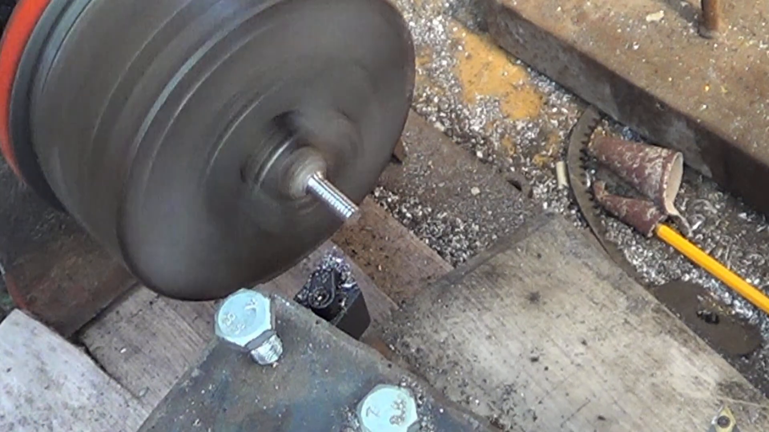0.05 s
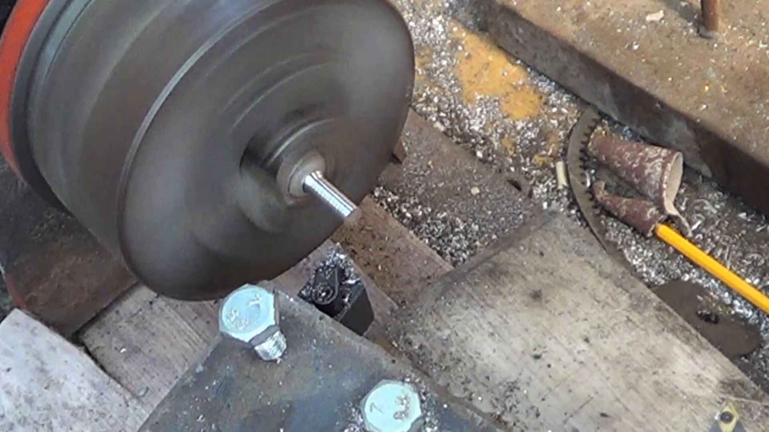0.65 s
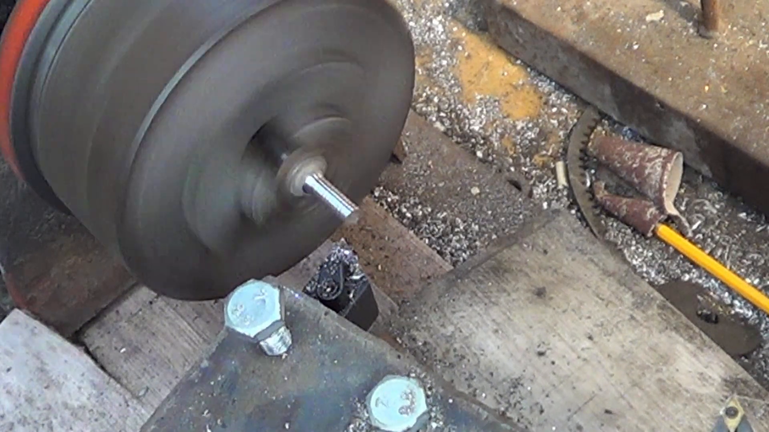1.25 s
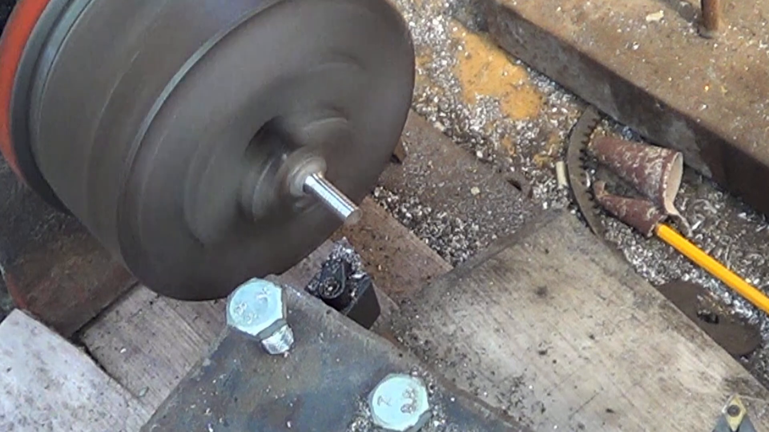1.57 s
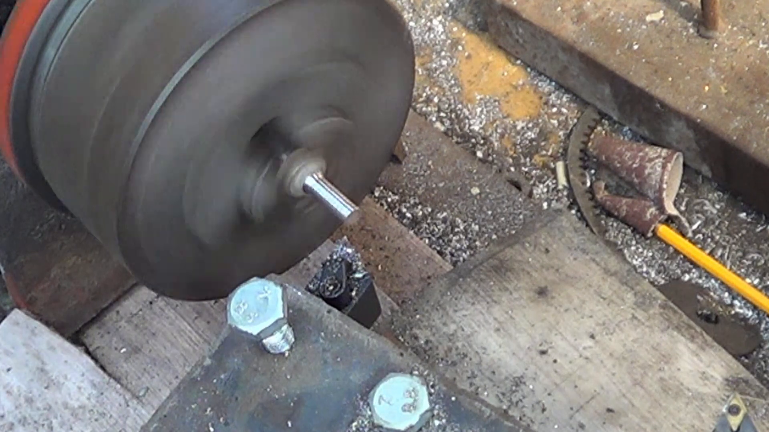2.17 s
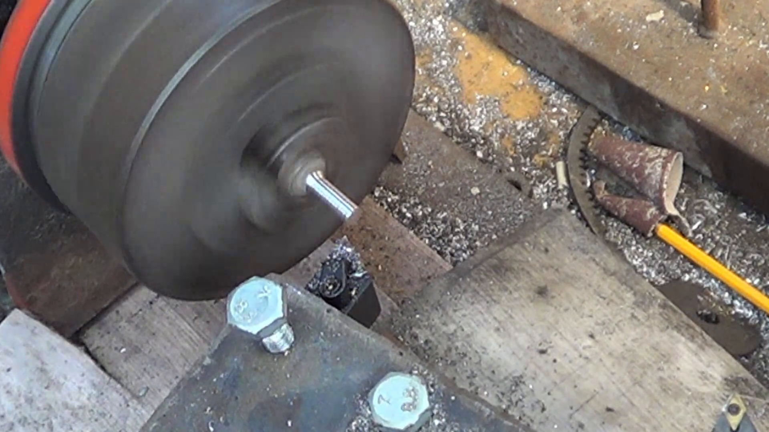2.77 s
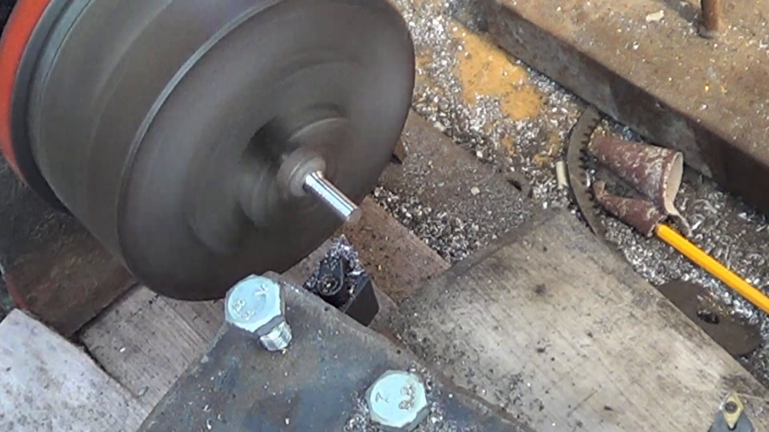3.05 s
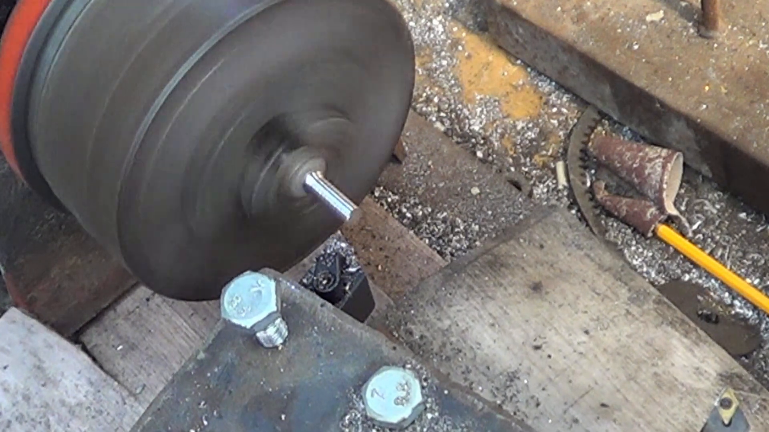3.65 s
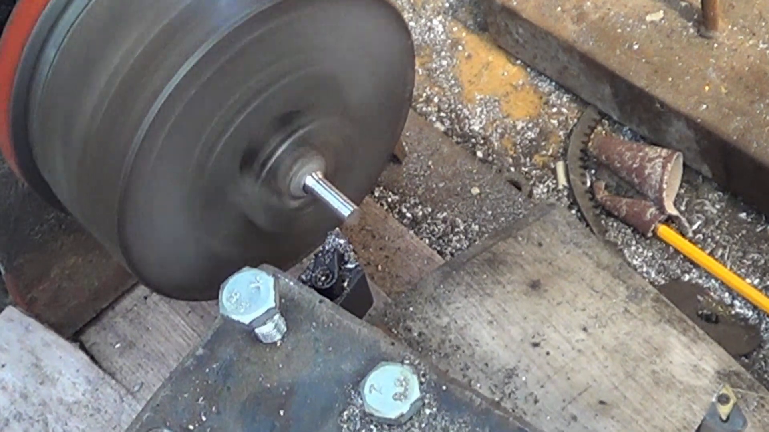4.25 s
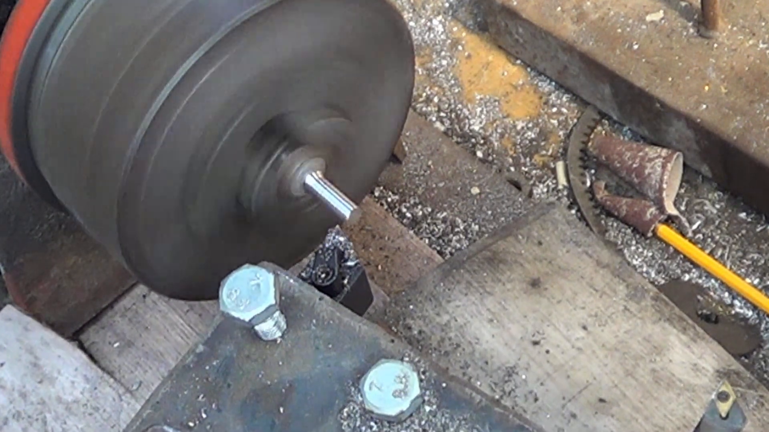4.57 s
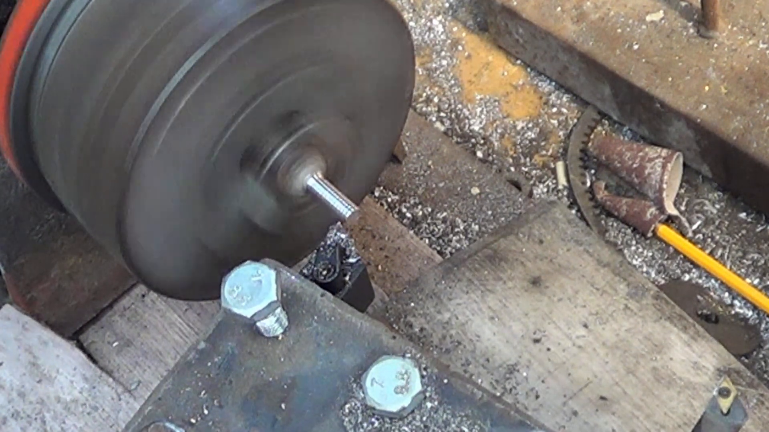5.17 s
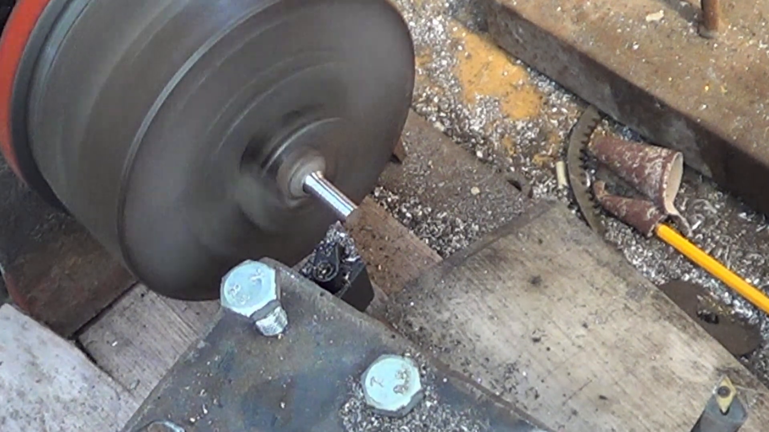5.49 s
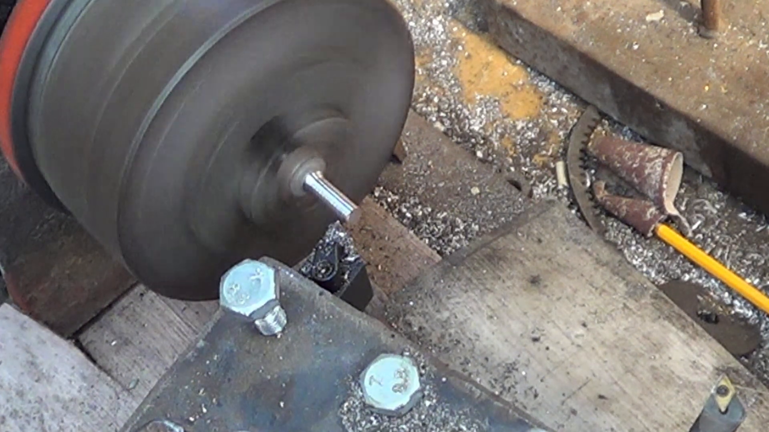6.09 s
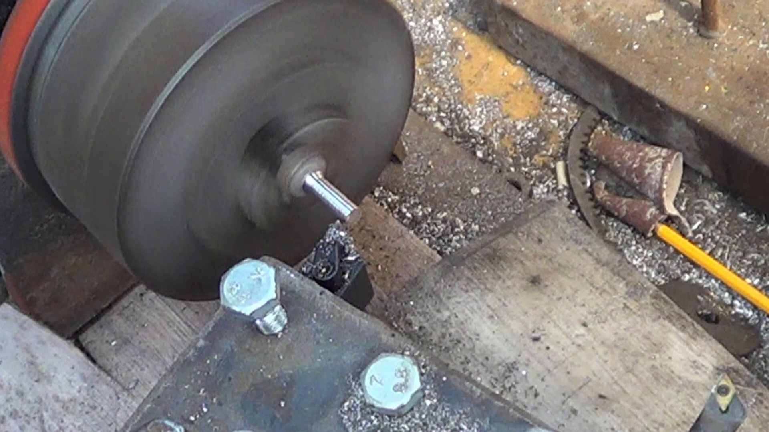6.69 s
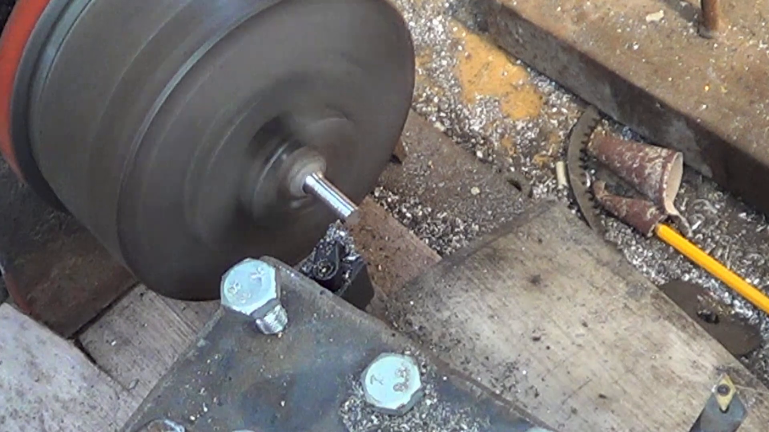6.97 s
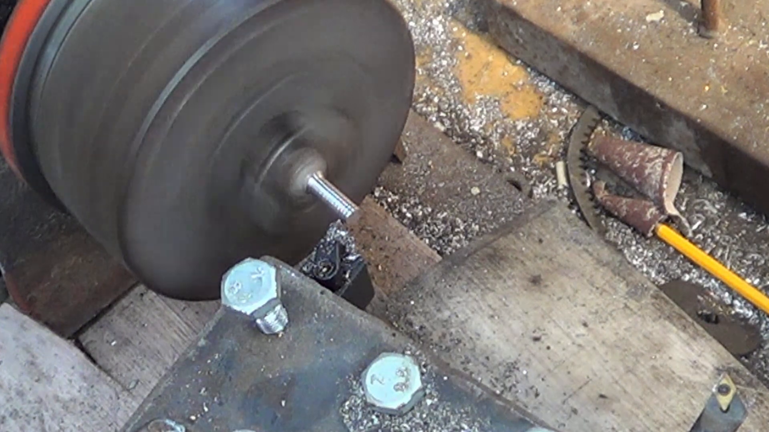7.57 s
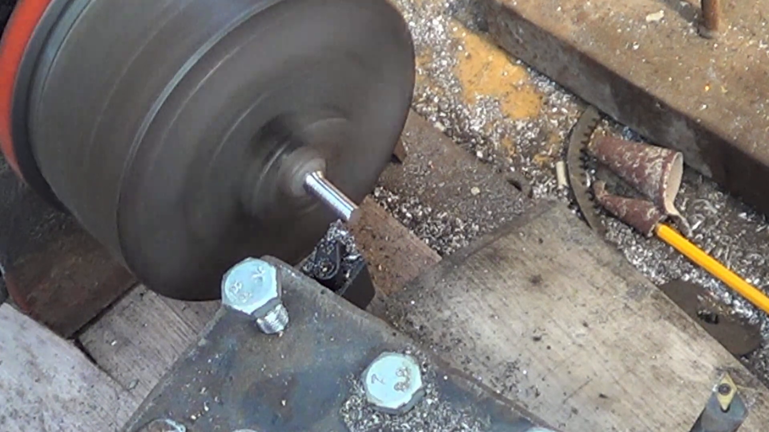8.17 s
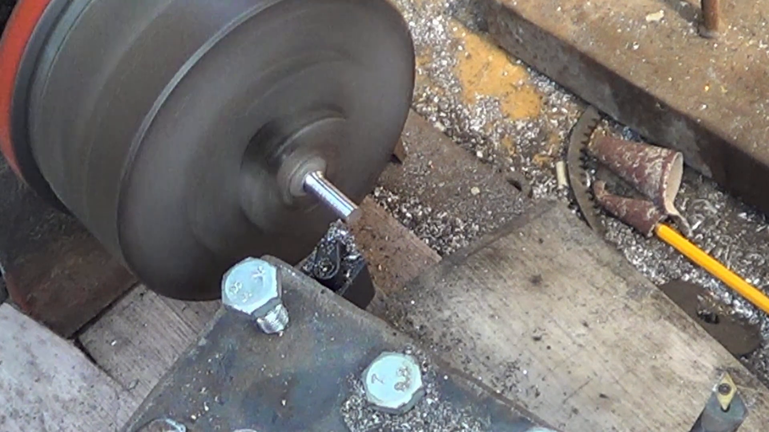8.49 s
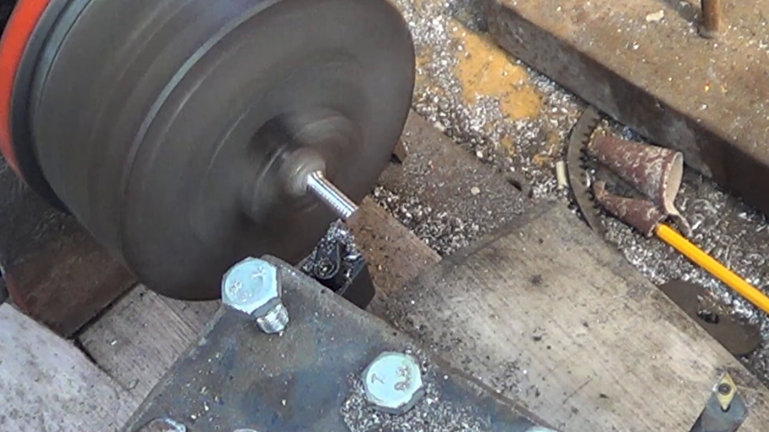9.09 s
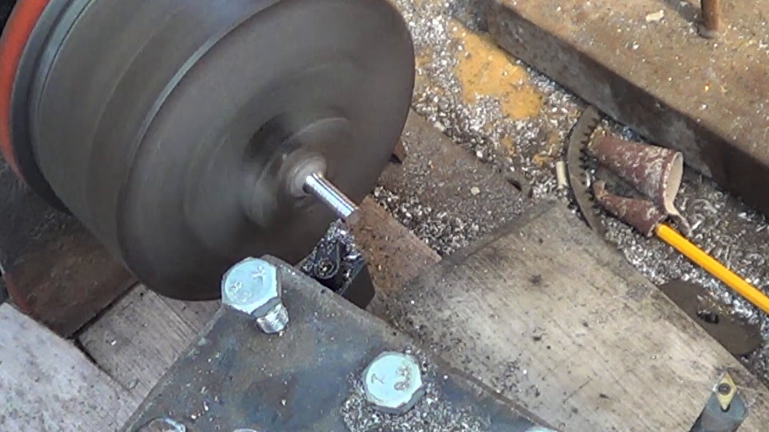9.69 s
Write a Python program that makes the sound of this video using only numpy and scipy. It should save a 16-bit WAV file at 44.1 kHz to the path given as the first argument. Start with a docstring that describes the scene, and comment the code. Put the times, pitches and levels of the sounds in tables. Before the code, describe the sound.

Close up, a lathe's electric motor whines and hisses, gradually gaining speed while its gears hum and a steel part rings.

```python
"""A workshop, with a stereo pair close to a small metal lathe that spins a bolt in its chuck.
The motor slowly gathers speed: its whine climbs through the resonances of its housing, and its
carbon brushes hiss on the commutator. The gear train hums and rattles in the headstock, where one
steel part keeps ringing. A short, diffuse reverberation gives the sound width."""
import sys
import numpy as np
from scipy import signal
from scipy.fft import rfft, irfft, next_fast_len
from scipy.io import wavfile
from scipy.ndimage import map_coordinates

SR = 44100
rng = np.random.default_rng(int(sys.argv[2]) if len(sys.argv) > 2 else 0)


def to_wav(sig):
    """Store sig (one row per channel, or 1-D mono) as 16-bit WAV at the path in sys.argv[1].

    Samples outside -1..1 are clipped; the rate is SR.
    """
    pcm = np.clip(np.atleast_2d(sig), -1, 1) * 32767
    pcm = np.round(pcm).astype(np.int16)
    wavfile.write(sys.argv[1], SR, pcm.T)  # frames by channels


N = 433944

SLOTS, TOP_SPEED = 18, 357.16  # armature slots; turns a second that the motor tends towards
TOP_HZ = 15680  # upper edge of the band
# parts geared to the motor, each binding once a revolution: motor turns each, tight spot t/s, swell/dB
CHUCK, PULLEY, BELT = (38.02, 0.002, .5), (21.99, 0.067, .4), (141, 0.034, .35)
# quick and slow stage of the run-up: speed still to gain/Hz, time constant/s
RUN_UP_STAGES = [(43.21, 1.9), (102.09, 9.7)]
# the armature's slot tones: multiple of the slot rate, level/dB, base level of the side tones/dB
SLOT_HARMONICS = [(1, -43, -47), (2, -55.5, -58.5), (3, -49, -54), (4, -36, -55)]
# overtones the uneven armature favours: order (multiple of the motor speed), level/dB
FAVOURED_ORDERS = [(16, -46), (31, -53), (33, -48), (43, -44), (50, -50), (55, -48), (61, -50.5)]
# how well the motor housing radiates: f/Hz, level/dB
HOUSING_RESPONSE = [(2000, -4.5), (3000, -3), (4300, 1.5), (5000, -3), (5500, -1), (6500, -.5), (7500, 0),
                    (8500, 1.5), (9400, 3), (10500, -1), (12000, 2), (13000, 1.5), (14500, 2.5), (15600, 3)]
# housing modes, each driven by the overtone whose force pattern fits it: order, f/Hz, width/Hz, level/dB
HOUSING_MODES = [(12, 3673, 46, -43.8), (12, 3765, 36, -46.4), (14, 3290, 70, -41), (15, 4362, 133, -39.4),
                 (16, 3590, 90, -37.5), (16, 4968, 52, -41.7), (17, 4427, 183, -42.4),
                 (17, 5367, 45, -37.1), (18, 3860, 260, -38), (18, 4270, 220, -32), (18, 5540, 16, -37.5),
                 (18, 5625, 70, -37), (18, 5728, 40, -37), (20, 5361, 109, -44.0), (21, 5368, 50, -36),
                 (21, 6519, 62, -43.8), (22, 6050, 330, -43.5), (22, 6699, 202, -46.0),
                 (22, 6928, 157, -45.4), (25, 7479, 252, -43.6), (26, 8147, 137, -39.2),
                 (29, 8639, 351, -44.8), (30, 9140, 222, -37.6), (30, 9518, 89, -39.2),
                 (32, 9430, 336, -38.6), (32, 10120, 240, -42.9), (33, 9480, 448, -39.7),
                 (34, 10604, 369, -43.0), (35, 7956, 646, -41.2), (35, 9120, 368, -36.8),
                 (36, 7740, 210, -27), (36, 8080, 220, -27.5), (36, 8620, 400, -38), (36, 9230, 200, -33.5),
                 (36, 9920, 620, -29.5), (36, 10470, 220, -36), (36, 10980, 70, -34), (36, 11290, 220, -37),
                 (37, 8666, 565, -39.8), (37, 9428, 336, -35.0), (37, 10592, 327, -39.5),
                 (38, 9162, 532, -36.2), (38, 11996, 225, -40.1), (39, 11885, 268, -43.4),
                 (41, 11791, 422, -44.1)]
# slow drift of the brush contact: t/s, level/dB
CONTACT_DRIFT = [(0.0, -1.4), (1.05, 1.1), (1.18, -0.7), (3.03, 0.2), (4.33, -0.5), (4.57, 1.6),
                 (5.06, -0.5), (5.27, 1.1), (5.44, -1.6), (5.57, 0.1), (6.49, -0.9), (7.16, 1.6),
                 (7.29, -0.1), (8.54, 0.2), (8.75, 1.4), (9.04, 0.3), (9.42, 0.8), (9.84, -1.3)]
# colour of the brush hiss: f/Hz, level/dB
HISS_SPECTRUM = [(1500, -8), (2700, -2), (3300, 2), (4300, 3), (4900, -2), (6200, 0), (7500, 0.5),
                 (9500, 1.1), (10700, -1.5), (12200, -1.5), (13500, -6)]
# tones of the gear train: order, level/dB
GEAR_TONES = [(0.842, -29.1), (0.868, -30.4), (1.181, -29.6), (1.324, -25.1), (1.466, -30.5),
              (1.632, -32.1), (1.808, -32.2), (2.119, -29.5), (2.892, -33.7), (3.06, -33.7), (3.205, -28.5),
              (3.447, -34.9), (3.517, -31.8), (3.614, -32.5), (4.235, -34.0), (5.001, -36.4),
              (7.001, -28.0), (7.95, -34.3)]
# broad response of the headstock: f/Hz, level/dB
HEADSTOCK_RESPONSE = [(25, -46), (100, -41), (150, -23), (230, -17), (310, -23), (480, -28.5), (540, -15),
                      (700, -18.5), (1050, -17.5), (1290, -16), (1380, -24), (1750, -19), (2200, -25.5),
                      (2600, -36.5), (3600, -53), (6000, -100)]
# resonances of the headstock and its covers: f/Hz, width/Hz, level/dB
HEADSTOCK_MODES = [(259, 19, -13.5), (362, 25, -3.7), (392, 11, -7.5), (413, 14, -13.9), (719, 7, -17.4),
                   (778, 37, -17.8), (852, 29, -10.9), (898, 21, -10.5), (916, 12, -4.9), (961, 15, -5.6),
                   (987, 31, -5.7), (1154, 18, -15.5), (1258, 11, -16.0), (1595, 19, -21.8),
                   (1652, 10, -17.5), (1860, 17, -14.6), (1902, 42, -20.5)]
# how hard the steel part rings: t/s, level/dB
RING_LEVELS = [(0.0, -30.5), (1.26, -32), (1.47, -24), (2.51, -35), (3.18, -29), (3.31, -33.5), (4.27, -29),
               (4.78, -38.5), (5.23, -28), (5.86, -32), (6.11, -27.5), (7.12, -32), (7.33, -26.4),
               (7.5, -31), (8.17, -28.5), (9.84, -31)]
# reverberation time of the workshop: f/Hz, t60/s
ROOM_DECAY = [(150, .3), (1500, .3), (12000, .2)]
# strength of the reverberation: f/Hz, level/dB
ROOM_LEVELS = [(80, -13), (170, -20), (380, -12), (650, -7.5), (1050, -19), (1300, -7.5), (1900, -14),
               (3000, -11), (5000, -11.5), (7000, -13.5), (10000, -12.5), (12500, -35)]
# left microphone over right: f/Hz, level/dB
MIC_BALANCE = [(60, 1), (170, -2.5), (380, -0.5), (750, 0), (960, -1.2), (1084, 1.8), (1220, 2.2),
               (1600, 2.2), (4400, 1), (8120, 1.5), (15000, -1.5)]
# left microphone ahead of right: f/Hz, phase/rad
MIC_LEAD = [(0, 0), (260, -1.1), (780, -0.3), (1380, -0.4), (2150, 0.0), (3270, -0.2), (4390, -0.0),
            (5250, -0.2), (7670, 0.1), (8010, -0.1), (8270, -0.0), (11200, -0.1), (12100, -0.0),
            (16500, -0.0)]


def amp(db):
    """Decibels to gain."""
    return 10 ** (np.asarray(db) / 20)


def unit(x):
    """x at rms 1."""
    return x / np.sqrt(np.mean(np.abs(x) ** 2) + 1e-20)


def along(points, hz):
    """A table of f/Hz and value, read at hz on a log axis."""
    f, values = np.transpose(points)
    return np.interp(np.log(hz + 1), np.log(f + 1), values)


def timeline(points):
    """A table of t/s and value, read at every sample."""
    return np.interp(np.arange(N) / SR, *np.transpose(points))


def wander(position):
    """A smooth random function of position, with one knot per unit."""
    grid = np.arange(0, 2048, 1 / 8)
    return np.interp(position, grid, map_coordinates(rng.standard_normal(2048), [grid]))


def wobble(rate):
    """A smooth random curve in time, rate knots a second."""
    return wander(np.arange(N) * rate / SR)


def filtered(x, response):
    """x through a complex frequency response."""
    size = next_fast_len(N + SR // 2)
    return irfft(rfft(x, size) * response(np.fft.rfftfreq(size, 1 / SR)), size)[..., :N]


def noise(response):
    """Noise of rms 1 with the given colour."""
    return unit(filtered(rng.standard_normal(N), response))


def tone(turns):
    """A sine of rms 1 that starts anywhere in its cycle."""
    return np.sqrt(2) * np.sin(2 * np.pi * (turns + rng.random()))


def resonance(hz, centre, width):
    """A peak of height 1 with steep skirts."""
    return 1 / (1 + (4 / 3 * (hz - centre) / width) ** 2)


def run_up():
    """Motor speed in turns a second, closing in on its top speed."""
    t = np.arange(N) / SR
    return TOP_SPEED - sum(gap * np.exp(-t / lag_s) for gap, lag_s in RUN_UP_STAGES)


def binding(turns, part, lag_s=0):
    """Drag of a turning part: 1 at its tight spot, -1 opposite it; lag_s delays the cycle."""
    ratio, tight_s, _ = part
    tight_turns = np.interp(tight_s + lag_s, np.arange(N) / SR, turns)
    return np.cos(2 * np.pi * (turns - tight_turns) / ratio)


def shaft(speed):
    """Turns of the motor: the heavy chuck drags once a revolution, and the teeth make it judder."""
    turns = np.cumsum(speed) / SR
    return turns + .002 * binding(turns, CHUCK) + .001 * wobble(25) + .001 * wobble(190)


def brush_contact(turns, flutter_db=.5):
    """Brush contact in dB: it drifts, follows the load of the turning parts and flutters."""
    load_db = sum(part[2] * binding(turns, part) for part in (CHUCK, PULLEY, BELT))
    return timeline(CONTACT_DRIFT) + load_db + flutter_db * wobble(18)


def armature_overtone(order, bed_db=-51, even_db=2.2, bed_fall_db=3, side_fall_db=1.5):
    """Strength of one overtone: a bed, favoured orders, and slot tones with side tones round them."""
    floor_db = bed_db + even_db * (order % 2 == 0) - bed_fall_db * max(order - 2 * SLOTS, 0)
    power = amp(floor_db) ** 2 + sum(amp(db) ** 2 for k, db in FAVOURED_ORDERS if k == order)
    for multiple, tone_db, side_db in SLOT_HARMONICS:
        away = abs(order - SLOTS * multiple)
        power += amp(side_db - side_fall_db * (away + 1) if away else tone_db) ** 2
    return np.sqrt(power)


def motor_whine(speed, turns, contact_db, whine_db=-3.0, contact_share=0.9, effort_db=-1.5,
                ripple_hz=100, flicker_db=3.5, slot_db=-0.04, slot_flicker_db=3.0, stutter_db=4.5):
    """Shaft overtones swell and fade as they climb through the housing's narrow resonances."""
    effort = (TOP_SPEED - speed) / (TOP_SPEED - speed[0])
    drive_db = effort_db * (effort - effort.mean())  # rises slightly as the motor gains speed
    whine = np.zeros(N)
    for order in range(9, 4 * SLOTS + 1):
        hz = order * speed
        broad = armature_overtone(order) * amp(along(HOUSING_RESPONSE, hz) + drive_db)
        peaks = sum(amp(db) * resonance(hz, f, width) for k, f, width, db in HOUSING_MODES if k == order)
        # fine resonances and the shifting brush contact make each overtone flicker on its own
        flicker = (wander(hz / ripple_hz) + wobble(8) + wobble(45)) / np.sqrt(3)
        if order % SLOTS:
            sway = amp(flicker_db * flicker)
        else:  # slot tones flicker less, but stutter in quick dips
            stutter = unit(amp(-stutter_db * np.maximum(wobble(55), 0) ** 2))
            sway = amp(slot_db + slot_flicker_db * flicker) * stutter
        whine += np.hypot(broad, peaks) * sway * (hz < TOP_HZ) * tone(order * turns)
    return whine * amp(whine_db + contact_share * contact_db)


def brush_hiss(turns, contact_db, hiss_db=-31.0, chop=0.044, chatter_db=1.5):
    """Carbon slides on the commutator, pressed a little harder once each turn."""
    pressure = (1 + chop * tone(turns)) * amp(chatter_db * wobble(80))
    friction = noise(lambda hz: amp(along(HISS_SPECTRUM, hz)))
    return amp(hiss_db + contact_db) * unit(pressure * friction)


def headstock(hz):
    """Gain of the headstock: its broad response plus its resonances."""
    grid = np.arange(SR // 2)
    broad_power = amp(along(HEADSTOCK_RESPONSE, grid)) ** 2
    mode_power = sum((amp(db) * resonance(grid, f, width)) ** 2 for f, width, db in HEADSTOCK_MODES)
    return np.interp(hz, grid, np.sqrt(broad_power + mode_power))


def gear_hum(speed, turns, mesh_db=1, slack=0.01, waver_db=1.96):
    """Meshing teeth give tones that stand out while they cross a headstock resonance."""
    hum = np.zeros(N)
    for order, db in GEAR_TONES:
        play = slack * wobble(10)  # slack between the teeth shifts the phase
        level_db = db + mesh_db + waver_db * wobble(5)
        hum += amp(level_db) * headstock(order * speed) * tone(order * turns + play)
    return hum


def gear_rattle(turns, loose_db=-25, repeating_db=-27.0, contacts=2048):
    """Small tooth contacts shake the headstock; some come back with every turn of the chuck."""
    chuck_turns = turns / CHUCK[0]
    teeth = np.interp(chuck_turns, np.arange(contacts) / contacts, rng.standard_normal(contacts), period=1)
    return amp(loose_db) * noise(headstock) + amp(repeating_db) * unit(filtered(teeth, headstock))


def steel_ring(turns, ring_hz=1084, width_hz=18, ring_db=2, swell_db=1.6, waver_db=2.0, drift=.19):
    """The gears keep a steel part ringing; it swells once a chuck turn, about midway between tight spots."""
    sway_db = swell_db * binding(turns, CHUCK, lag_s=0.098) + waver_db * wobble(14)
    firm = tone(ring_hz * np.arange(N) / SR + drift * wobble(11) + 2 * drift * wobble(3))
    blur = .42 * noise(lambda hz: resonance(hz, ring_hz, width_hz))
    return amp(timeline(RING_LEVELS) + sway_db + ring_db) * (firm + blur)


def close_pair(source):
    """Direct sound reaches the two microphones slightly apart in level and phase."""
    side = np.array([[.5], [-.5]])
    return filtered(source, lambda hz: amp(side * along(MIC_BALANCE, hz))
                    * np.exp(1j * side * along(MIC_LEAD, hz)))


def workshop_reverb(source):
    """A short, diffuse reverberation, added to left and right with opposite sign for width."""
    hz, t, spectrum = signal.stft(rng.standard_normal(SR // 3), SR, nperseg=256)
    decay = amp(-60 * t / along(ROOM_DECAY, hz)[:, None])  # treble dies soonest
    _, tail = signal.istft(spectrum * decay, SR, nperseg=256)
    reverb = signal.fftconvolve(source, tail / np.linalg.norm(tail))[:N]
    return filtered(reverb, lambda f: amp(along(ROOM_LEVELS, f))) * np.array([[1], [-1]])


def scene():
    """The whole lathe follows its motor shaft, heard close up with a little of the room."""
    speed = run_up()
    turns = shaft(speed)
    contact_db = brush_contact(turns)
    motor = motor_whine(speed, turns, contact_db) + brush_hiss(turns, contact_db)
    lathe = motor + gear_hum(speed, turns) + gear_rattle(turns) + steel_ring(turns)
    return close_pair(lathe) + workshop_reverb(lathe)


def record(dry):
    """Both microphone channels are cut off at the upper edge of the band."""
    return filtered(dry, lambda hz: hz < TOP_HZ)


dry = scene()
out = record(dry)
to_wav(out)
```